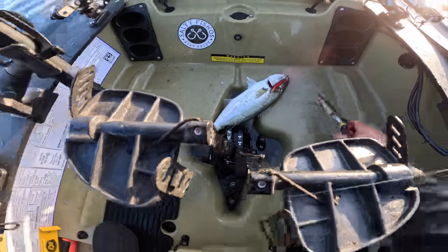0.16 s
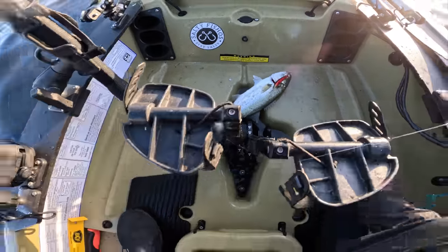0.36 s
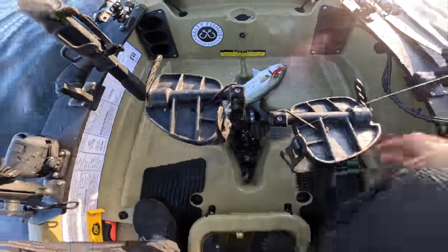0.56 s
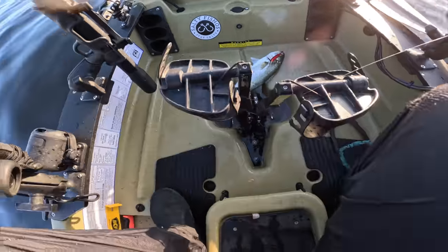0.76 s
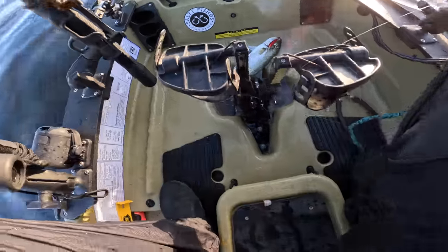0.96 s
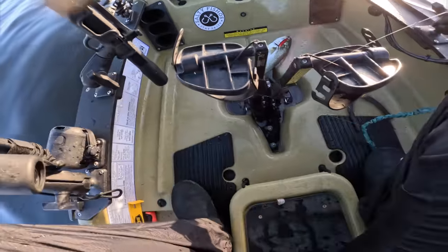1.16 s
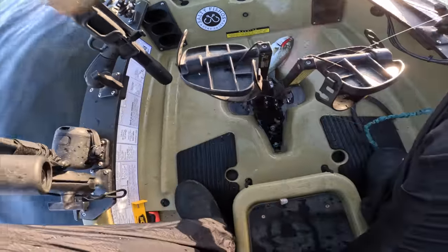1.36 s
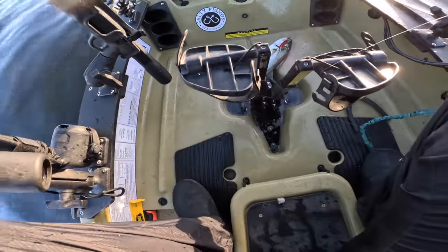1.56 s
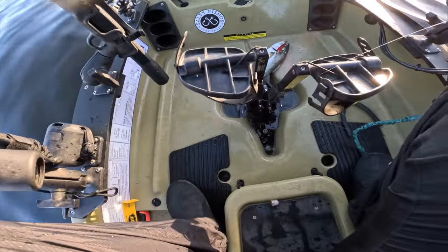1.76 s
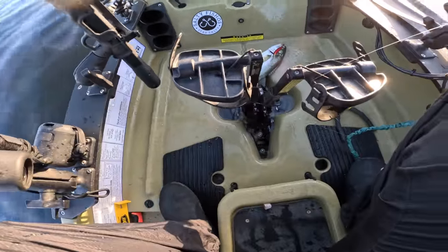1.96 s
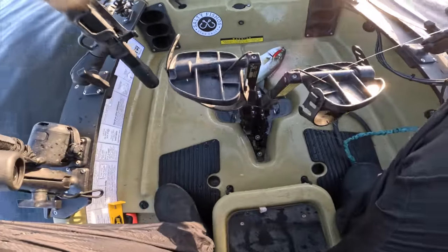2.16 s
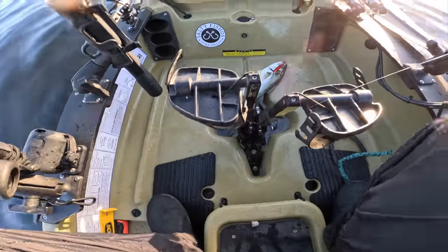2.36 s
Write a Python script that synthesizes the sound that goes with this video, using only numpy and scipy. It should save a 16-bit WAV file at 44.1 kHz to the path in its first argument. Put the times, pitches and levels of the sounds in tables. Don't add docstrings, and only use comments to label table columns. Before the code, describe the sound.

A fish thrashes on a hollow plastic kayak deck, three booming wet slaps, then gear knocks

```python
import sys
import numpy as np
from scipy import signal
from scipy.io import wavfile
from scipy.ndimage import uniform_filter1d

SR = 44100
rng = np.random.default_rng(int(sys.argv[2]) if len(sys.argv) > 2 else 0)


def generate_wav(sig):
    pcm = np.round(np.clip(np.atleast_2d(sig).T, -1, 1) * 32767).astype(np.int16)
    wavfile.write(sys.argv[1], SR, pcm)


def invert_db(x):
    u = np.asarray(x, float) / 20
    return 10 ** u


N = 110250


def rms_one(x):
    return x / np.sqrt(np.mean(x ** 2) + 1e-20)


def in_time(rows):
    s, *columns = np.transpose(rows)
    return [np.interp(np.arange(N) / SR, s, c) for c in columns]


def at_hz(points, hz):
    table_hz, db = np.transpose(points)
    return np.interp(np.log(hz), np.log(table_hz), db)


def drift(rate):
    r = np.exp(-80 * np.pi * rate / SR)
    slow = signal.lfilter([1], [1, -2 * r, r * r], rng.standard_normal(N // 40 + 2002))[2000:]
    return np.interp(np.arange(N) / 40, np.arange(len(slow)), rms_one(slow))


def ring(clicks, hz, t60):
    r, w = invert_db(-60 / (t60 * SR)), 2 * np.pi * hz / SR
    return signal.lfilter([0, np.sin(w)], [1, -2 * r * np.cos(w), r * r], clicks + 1e-18)


def band(x, low_hz, high_hz, order=2):
    edges = [low_hz, min(high_hz, .45 * SR)]
    return signal.sosfilt(signal.butter(order, edges, "band", fs=SR, output="sos"), x)


def dull(x, top_hz, order=2):
    return signal.sosfilt(signal.butter(order, top_hz, fs=SR, output="sos"), x)


def spread(mid, side):
    return np.array([mid + side, mid - side])


def pan_gain(left_right_db):
    return invert_db(np.array([[.5], [-.5]]) * left_right_db)


def strike(s, db, modes, scatter_db):
    luck, out = rng.standard_normal((len(s), len(modes))), 0
    for k, (hz, level_db, t60) in enumerate(modes):
        clicks = np.zeros(N)
        np.add.at(clicks, (s * SR).astype(int), invert_db(db + level_db + scatter_db * luck[:, k]))
        out = out + (-1) ** k * ring(clicks, hz, t60)
    return out


def burst(s, db, low_hz, high_hz, t60, attack):
    t = np.arange(int(.15 * SR)) / SR
    edges = np.geomspace(low_hz, high_hz, 2 + int(3 * np.log2(high_hz / low_hz)))
    white = rng.standard_normal((14, len(t) + 500))
    swell, after = np.minimum(t / attack, 1) ** 2, np.maximum(t - attack, 0)
    puff = 0
    for w, low, high in zip(white, edges, edges[1:]):
        decay = invert_db(-60 * after / t60 * (low / low_hz) ** 0.17)
        tilt_db = -5 * np.log2(low / low_hz)
        puff = puff + invert_db(tilt_db) * rms_one(band(w, low, high)[500:] * swell * decay)
    out = np.zeros(N + len(t))
    start = int(s * SR)
    out[start:start + len(t)] = invert_db(db) * puff / np.abs(puff).max()
    return out[:N]


# time in seconds, side level in dB.
WIDTH = [(0, -37), (.4, -8), (1.0, -6.5), (2.0, 3), (2.5, 4)]
# frequency in Hz, side level in dB.
WIDTH_BY_HZ = [(100, -35.5), (500, -16), (2000, -6), (8000, -8.5), (11000, -1)]


def banded_noise(spectrum, patchy_db, rate):
    out, edges = 0, 40 * 2 ** np.arange(0, 9, .5)
    white = rng.standard_normal((2, 2, N))
    together, (wide_db,) = drift(rate), in_time(WIDTH)
    for k, (low, high) in enumerate(zip(edges, edges[1:])):
        mid, side = band(white[k % 2], low, high)
        hz = np.sqrt(low * high)
        gain = invert_db(at_hz(spectrum, hz) + patchy_db * (0.42 * together + drift(22)))
        side_gain = invert_db(wide_db + at_hz(WIDTH_BY_HZ, hz))
        out = out + gain * spread(mid, (side + 0.49 * mid) * side_gain)
    return rms_one(out)


# time in seconds, level in dB.
WIND = [
    (0.0, -45),
    (0.07, -57),
    (0.74, -52),
    (0.81, -60.5),
    (1.95, -40.5),
    (1.98, -36.5),
    (2.46, -30.5),
]


def wind():
    likeness, right_db, lump_db = 0.9, 2.8, 3.5
    mid, side = band(rng.standard_normal((2, N)), 22, 46, order=1)
    mid, side = dull([rms_one(mid), rms_one(side)], 150)
    both = spread(mid, np.sqrt((1 - likeness) / 2) * side) * pan_gain(-right_db)
    return invert_db(in_time(WIND)[0] + lump_db * np.tanh(drift(25))) * both


def wash():
    noise = rms_one(band(rng.standard_normal(N), 560, 1500))
    return invert_db(-40.5 + 0.56 * in_time(WIND)[0] + 2.1 * drift(8)) * noise


# time in seconds, pitch in Hz, level in dB.
ENGINE = [
    (0, 175, -41.5),
    (.9, 174, -51),
    (1.7, 174, -39.5),
    (1.85, 164, -42),
    (2.5, 165, -44),
]


def engine():
    hz, db = in_time(ENGINE)
    phase = 2 * np.pi * np.cumsum(hz + 1.465 * drift(4.9)) / SR
    flicker = invert_db(3 * drift(24))
    tone = np.sqrt(2) * flicker * (np.sin(phase) + invert_db(-16) * np.sin(2 * phase))
    throb = rms_one(band(rng.standard_normal(N), 84, 116))
    return invert_db(db) * (tone + invert_db(1.5) * throb)


# frequency in Hz, density in dB per Hz.
WATER = [(45, -3.5), (170, -5.5), (330, -16), (455, -25), (750, -21.5), (1700, -54), (7500, -53.5),
         (12000, -71)]


def water():
    return invert_db(-42) * banded_noise(WATER, patchy_db=1.5, rate=0.88)


# time in seconds, level in dB.
WELL = [(0, -46.5), (.6, -45.5), (.75, -61.5), (1.4, -58.5), (2.5, -58.5)]


def well():
    resonance_hz, width_hz = 725, 80
    low_hz, high_hz = resonance_hz - width_hz / 2, resonance_hz + width_hz / 2
    hum = band(rng.standard_normal(N), low_hz, high_hz, order=1)
    return invert_db(in_time(WELL)[0]) * rms_one(band(hum, 320, 2200))


# peak time in seconds, level in dB, rise in seconds, fall in seconds.
RUSTLE = [(.06, -57, 0.12, 0.069), (.3, -46.5, 0.086, 0.069), (0.498, -56, 0.16, 0.41),
          (.7, -50, 0.068, 0.048), (0.819, -52, 0.029, 0.049), (1.2, -52, 0.12, 0.11),
          (1.57, -58.5, 0.077, 0.13), (1.77, -61, 0.039, .06), (2.1, -74.5, 0.02, 0.098),
          (2.46, -54, 0.068, 0.14)]
# frequency in Hz, density in dB per Hz.
CLOTH = [(900, 2.5), (1400, 0), (2700, 0.1), (4700, -7), (7650, -8.5), (9000, -28), (11000, -18),
         (15500, -49.5)]


def rustle():
    t, power = np.arange(N) / SR, 0
    for s, db, rise, fall in RUSTLE:
        power = power + invert_db(2 * db) * np.exp(-((t - s) / np.where(t < s, rise, fall)) ** 2)
    level = np.sqrt(power)
    thin = rms_one(band(rng.standard_normal(N), 11300, 14200))
    floor = invert_db(-86.5 + 2.5 * drift(4))
    thin = thin * (level * invert_db(-25 + 0.2 * in_time(WIDTH)[0]) + floor)
    return level * banded_noise(CLOTH, patchy_db=1.6, rate=64) + thin * [[1], [0]]


def tick(s, db, low_hz, top_hz):
    click = np.zeros(N)
    click[int(s * SR)] = 1
    r = np.exp(-2 * np.pi * 0.21 * low_hz / SR)
    click = band(signal.lfilter([1], [1, -r], click + 1e-18), low_hz, top_hz)
    tail = burst(s + 0.001093, -7.5, low_hz, top_hz, t60=0.052, attack=0.00015)
    both = click / np.abs(click).max() + tail
    return invert_db(db) * dull(both, min(1.1 * top_hz, 15000), order=6)


# start in seconds, peak in dB, low edge in Hz, top edge in Hz,
# left over right in dB.
TICKS = [(0.036, -37.5, 1720, 6700, 1), (0.076, -37, 1350, 5000, -0.5), (0.768, -46, 3400, 6360, 10.5),
         (0.827, -35.5, 1710, 4000, -7), (0.845, -44, 2470, 12200, 4), (.888, -42.5, 820, 2500, 2),
         (1.0529, -23.5, 450, 3200, 4.5), (1.053, -22, 316, 1430, -1), (1.1071, -35, 700, 2300, 3.5),
         (1.207, -32, 610, 1650, 1.5), (1.2865, -40.5, 1000, 2960, 6.5), (1.51, -35, 308, 2050, 8.5),
         (1.6095, -41, 1010, 2820, 5.5), (1.778, -39.5, 786, 2120, 7), (1.831, -49.5, 1170, 2230, 19),
         (2.1827, -34.5, 1826, 8850, -2), (1.442, -53, 600, 1500, 4), (2.4985, -45, 900, 15000, 9),
         (2.228, -43.5, 855, 1300, 4), (2.3166, -34, 1340, 4900, 0), (2.4618, -38.5, 810, 1500, 8)]


def ticks():
    return sum(tick(s, db, low, top) * pan_gain(pan) for s, db, low, top, pan in TICKS)


# frequency in Hz, level in dB, t60 in seconds.
CLASP = [(1750, -5, .018), (1940, -3, .02), (2820, 0, .014), (3555, 0, .022), (4180, -7, .015),
         (5750, -9, .015), (6400, -12, .015), (7070, -11, .016), (8500, -18, .012)]
# start in seconds, level in dB, dull above Hz, left over right in dB.
SNAPS = [
    (2.1833, -44.5, 9100, -7),
    (2.1861, -49, 8000, -1),
    (2.3165, -43.5, 4160, -9),
    (2.3193, -47.5, 4170, 3),
]


def clasp():
    out = 0
    for s, db, hz, pan in SNAPS:
        rung = dull(strike(np.array([s]), db, CLASP, scatter_db=1), hz)
        out = out + rung * pan_gain(pan)
    return out


# start in seconds, level in dB, pitch in Hz,
# t60 in seconds.
BUCKLE = [(1.0529, -25.5, 1030, .022), (1.0523, -32, 1686, .018), (1.0529, -44, 380, .03),
          (1.5079, -33, 478, 0.027), (1.5085, -38, 1100, .015), (.2215, -16, 580, .04),
          (.2375, -20, 620, .035), (.4935, -24, 520, .03), (.4935, -30, 3300, .015), (.472, -30, 1500, .06),
          (.643, -24, 1200, .04), (.6605, -28, 2800, .025), (2.3165, -40, 2750, .025),
          (2.3165, -40, 1750, .025), (2.1835, -41, 2800, .02)]


def buckle():
    return sum(strike(np.array([s]), db, [(hz, 0, t60)], scatter_db=1) for s, db, hz, t60 in BUCKLE)


# slap time in seconds, level in dB, low edge in Hz, top edge in Hz.
APPROACH = [
    (.2215, -29, 500, 1800),
    (.462, -28, 637, 9000),
    (0.633, -30.5, 685, 8650),
]


def approach():
    swell_s = .022
    return sum(burst(s - swell_s, db, low, top, 0.044, swell_s) for s, db, low, top in APPROACH)


# frequency in Hz, level in dB, t60 in seconds.
HULL = [(103.7, -11, 0.18), (122, -2.5, 0.04), (185.2, 1, 0.056), (218.4, 3, 0.076), (280, -2.5, 0.07),
        (304.1, -3.5, 0.048), (380, -16, 0.059)]
HULL_LOW_HZ = 89.6
# time in seconds, level in dB.
FLUTTER = [
    [(0.245, -23), (0.255, -18), (0.371, -41.5), (0.4, -85)],
    [(0.47, -8), (0.488, -14.5), (0.614, -17), (0.664, -5.5), (0.746, -15), (0.79, -25), (0.87, -37.5),
     (0.9, -68)],
]


def flutter():
    level = 0
    for spell in FLUTTER:
        before, after = (spell[0][0] - .01, -90), (spell[-1][0] + .03, -90)
        level = level + invert_db(in_time([before] + list(spell) + [after])[0])
    s = rng.uniform(.1, 1.1, 210)
    low = dull(strike(s, rng.normal(0, 4.5, len(s)), HULL, scatter_db=3.5), 370, order=4)
    low = band(low, 68, 2700)
    evened = low / np.sqrt(uniform_filter1d(low ** 2, size=600) + 1e-6)
    white = rng.standard_normal(N) * invert_db(5.0 * np.tanh(drift(80)))
    patter = rms_one(band(white, 310, 880))
    patter = patter + 0.5 * rms_one(band(white, 1300, 1450))
    patter = patter + 0.29 * rms_one(band(white, 2400, 3200))
    return level * invert_db(-5) * (evened + invert_db(-25) * patter)


# start in seconds, level in dB, pitch in Hz.
KNOCKS = [(.2215, -9.5, 400), (0.2326, -4.5, 232), (.495, -6, 258), (0.5096, -18, 279), (.5455, -10, 211),
          (.658, -9.5, 290), (.667, -10.5, 220), (.686, -13, 220), (0.695, -16, 223), (0.707, -4.5, 247),
          (.736, -5.5, 230), (.752, -12, 217)]


def knocks():
    cycles, rings = 4, 0
    for s, db, hz in KNOCKS:
        rings = rings + strike(np.array([s]), db, [(hz, 0, cycles / hz)], scatter_db=0.5)
    return -band(rings, HULL_LOW_HZ, 650)


# start in seconds, level in dB, pitch in Hz, attack in seconds.
SQUEAKS = [(0.209, -30, 2990, 0.013), (0.22, -18, 1346, 0.0036), (0.221, -21, 562, 0.0055),
           (0.236, -21, 1352, 0.0034), (0.221, -18.5, 361, 0.0038), (0.442, -27.5, 1500, 0.018),
           (0.459, -19.5, 1690, 0.0029), (0.4598, -30.5, 3520, 0.001), (0.46, -47, 4900, 0.0025),
           (0.615, -26.5, 2780, 0.018), (.632, -19, 770, 0.0025), (.633, -12, 1127, 0.0024),
           (.633, -33, 4640, 0.0018), (.633, -34.5, 5500, 0.0023)]


def squeaks():
    half_width = 2 ** (0.14 / 2)
    return sum(burst(s, db, hz / half_width, hz * half_width, 0.056, rise) for s, db, hz, rise in SQUEAKS)


# frequency in Hz, level in dB, t60 in seconds.
DECK = [(505, -3, .04), (572, -3, .04), (640, -3, .04), (760, -2, .04), (1090, -3, .03), (1290, -4, .03),
        (1352, -4, .03), (1740, -5, .03), (2000, -9, .03), (2340, -9, .03), (2750, -10, .03),
        (3400, -12, .025), (3700, -12, .025)]
# start in seconds, boom in dB, crack in dB, top of crack in Hz, spray in dB.
SLAPS = [
    (.2203, -15.5, -22, 1480, -54),
    (0.2355, -17, -19, 1490, -67),
    (0.461, -10, -15, 4900, -49.5),
    (0.494, -24, -22, 4160, -57.5),
    (0.509, -18, -28, 3000, -61),
    (0.536, -19, -33.5, 2550, -75),
    (0.634, -12.5, -11.5, 4060, -39),
    (0.6608, -16.5, -15.5, 3400, -69),
    (0.751, -44, -34.5, 1730, -67),
]


def slaps():
    lag_s, attack_s = 0.0025, 0.004
    s, boom_db, crack_db, top_hz, spray_db = np.transpose(SLAPS)
    boom = strike(s + 2 * lag_s, boom_db - 13, HULL, scatter_db=4.0)
    push = strike(s + lag_s, boom_db + 8.5, [(210, 0, 0.036)], scatter_db=2.0)
    out = band(boom - push, HULL_LOW_HZ, 390, order=3)
    for start, crack, top, spray in zip(s, crack_db, top_hz, spray_db):
        panel = strike(np.array([start]), crack - 11, DECK, scatter_db=5.0)
        out = out + band(panel, 300, 1.3 * top)
        out = out + burst(start - attack_s, crack, 450, top, 0.068, attack_s)
        out = out + burst(start - attack_s, spray, 4000, 10200, 0.049, attack_s)
    return out


def scene():
    fish = slaps() + squeaks() + knocks() + flutter()
    late = band(np.roll(fish, 40), 500, 9000, order=1)
    wide_fish = spread(fish, invert_db(-25.5) * (late + 0.1 * fish))
    outdoors = wind() + wash() + engine() + water() + well()
    gear = rustle() + ticks() + clasp() + buckle()
    return outdoors + gear + approach() + wide_fish


def band_limit(x):
    return signal.sosfilt(signal.butter(12, 15620, fs=SR, output="sos"), x)


def record(dry):
    rounded = 1.2 * np.tanh(dry / 1.2)
    mix = signal.sosfilt(signal.cheby2(10, 60, 17000, fs=SR, output="sos"), rounded)
    return band_limit(mix)


dry = scene()
out = record(dry)
generate_wav(out)
```